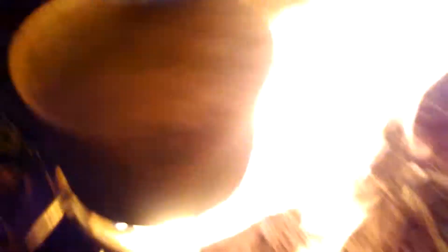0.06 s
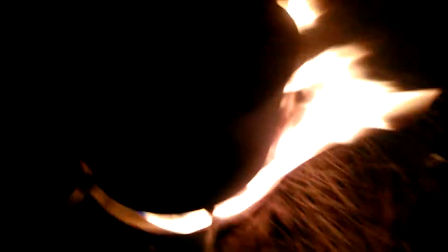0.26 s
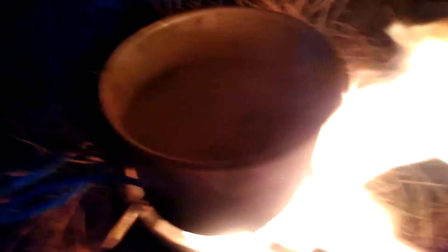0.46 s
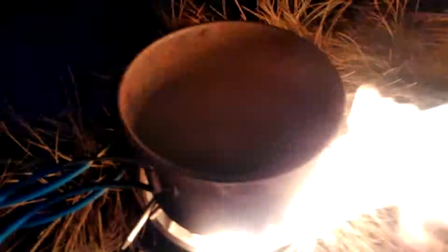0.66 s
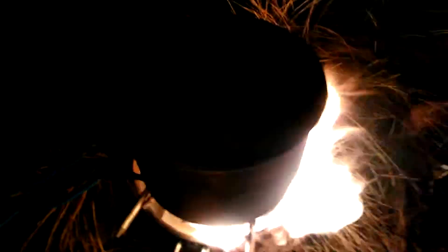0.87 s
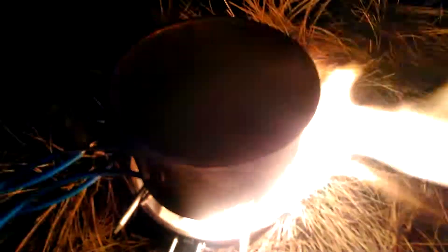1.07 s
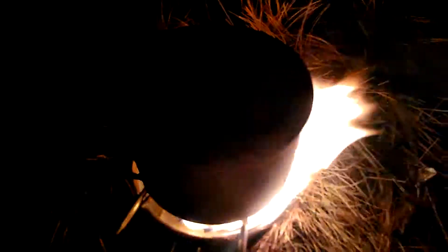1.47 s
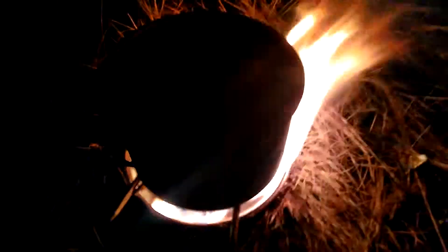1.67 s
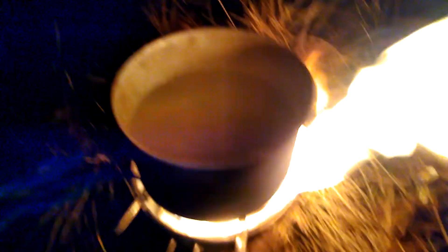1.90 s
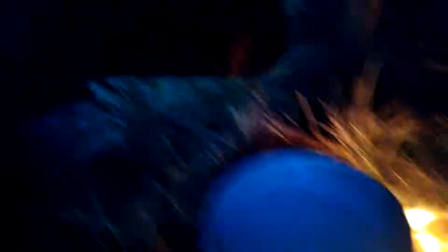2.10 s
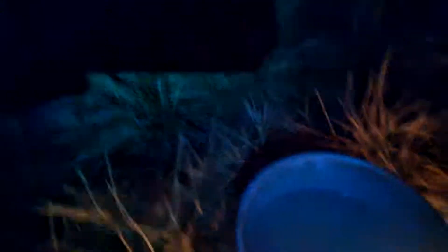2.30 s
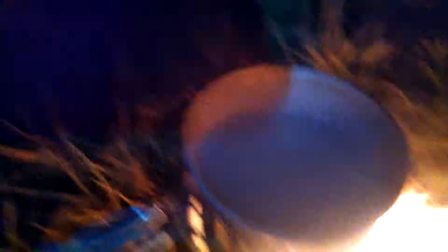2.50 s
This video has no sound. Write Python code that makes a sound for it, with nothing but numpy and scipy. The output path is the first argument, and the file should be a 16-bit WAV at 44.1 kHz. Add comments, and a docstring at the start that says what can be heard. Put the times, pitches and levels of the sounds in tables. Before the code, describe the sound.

Wind rumbles and thumps unevenly on a hand-held microphone at an outdoor camp, over steady thin hiss and a faintly fluttering stove flame. A single dry knock with a tiny rattle sounds halfway, then the gusts continue and fade.

```python
"""Light wind buffets a hand-held camera's two microphone ports, beside a small stove at a night camp.
Gusts rumble on both ports, mostly the right, where single eddies thump and the strongest gusts throb.
The flame under the pot is a soft roar that flutters in the gusts and gives off tiny pops.
One dry knock rings a few damped modes and trails a short, bright rattle.
A steady thin hiss lies under it all."""
import sys
import numpy as np
from scipy import signal
from scipy.fft import rfft, irfft, next_fast_len
from scipy.io import wavfile
from scipy.ndimage import uniform_filter1d, map_coordinates

SR = 44100
rng = np.random.default_rng(int(sys.argv[2]) if len(sys.argv) > 2 else 0)


def store_pcm(level_fs):
    """Save levels as 16-bit WAV."""
    pcm = np.round(np.clip(level_fs, -1, 1) * 32767).astype(np.int16)
    wavfile.write(sys.argv[1], SR, np.atleast_2d(pcm).T)


N = 116865
T = np.arange(N) / SR

# tone colour of each noise layer: frequency_hz, relative_db
HISS_LEFT_EQ = [(100, 0), (600, -2.5), (1100, -2.5), (1900, -1), (3300, -5), (4800, -12), (7000, -7),
                (9000, -2), (10500, -12), (13000, -12), (15500, -9)]
HISS_RIGHT_EQ = [(100, -17), (1100, -19.5), (2000, -20.5), (3400, -23), (5000, -16.5), (6200, -14.5),
                 (8000, -8.5), (8950, 1.5), (9800, -9.5), (11200, -18), (13300, -12), (15500, -21.5)]
FLAME_EQ = [(60, -8.5), (200, 1), (520, -1.5), (800, -11), (1300, -22.5), (2500, -43), (5000, -36)]
RATTLE_EQ = [(1200, -1), (2100, 1), (2550, -10), (3000, -2), (3700, 1), (4650, -7), (5600, -4), (6400, -7),
             (8000, -3), (9500, -7), (11000, -22), (13000, -22), (16000, -42)]
RUMBLE_EQ = [(20, -42), (33, -29), (46, -2.5), (72, 1), (110, -6.5), (170, -17), (300, -31), (600, -48),
             (1200, -61), (3000, -82)]
CHURN_EQ = [(70, -18), (150, 7.5), (300, -6), (550, -25), (1000, -31), (2500, -60)]
# slow drift of the hiss: time_s, gain_db
HISS_DRIFT = [(0, 0.5), (.16, 0), (.29, 1.25), (.62, 0.7), (.76, 0), (.9, 0.9), (1.08, -1), (1.41, -0.1),
              (1.65, -0.1), (1.85, 0.4), (2.1, .2), (2.23, -0.8), (2.37, 0.15), (2.65, 0.1)]
# the flame's roar between flutters: time_s, level_db
FLAME_BED = [(0, -62.5), (.5, -65.5), (.9, -60.5), (1.35, -61), (1.6, -70.5), (2.1, -65), (2.65, -70.5)]
# flutters of the flame: centre_s, level_db, half_length_s
FLUTTERS = [(0.212, -54.5, 0.0046), (0.26, -53, 0.0043), (0.312, -50, 0.0058), (.746, -43, 0.0058),
            (0.764, -50, 0.012), (0.812, -49.5, 0.042), (0.96, -68, 0.024), (1.299, -50.5, 0.017),
            (1.435, -52, 0.0094), (1.608, -54, 0.019), (1.693, -63, 0.0074), (2.033, -57, 0.008),
            (2.464, -59, 0.0035), (2.578, -56, 0.0052)]
# resonances of the knocked object: pitch_hz, level_db, t60_s, right_offset_db
BODY_MODES = [(232.4, -26, 0.089, 0.5), (383, -21.5, 0.072, -1), (520, -27.5, 0.048, 0),
              (902, -23, 0.036, -2.5), (1062, -31.5, 0.027, -3), (2090, -20, 0.035, -1.5)]
# the rattle's two contacts: start_s, level_db, t60_s, pitch_hz
CONTACTS = [(1.1586, -25.5, 0.014, 5600), (1.1605, -26, 0.016, 3700)]
# eddies on the right port: centre_s, level_db, half_width_s, signed_gain (+ pushes, - pulls)
EDDY_THUMPS = [(0.302, -23, 0.0011, -0.96), (0.313, -18.5, 0.002, 1), (0.419, -19.5, 0.0016, -0.84),
               (0.563, -12.5, 0.0029, -1.14), (0.6172, -17.5, 0.0011, -1.07), (0.6324, -10.5, 0.001, -1),
               (0.6349, -9.5, 0.00052, -0.89), (0.6496, -9, 0.001, -1.13), (0.7456, -15, 0.00094, -0.95),
               (0.748, -14, 0.00033, -0.98), (0.7491, -5.5, 0.00096, 0.83), (0.7707, -18, 0.00074, -1.2),
               (0.7774, -18.5, 0.00078, 0.97), (0.885, -22.5, 0.0012, -0.98), (0.974, -18.5, 0.0014, -0.85),
               (1.1694, -14, 0.0015, 0.91), (1.194, -18.5, 0.0012, -1.14), (1.545, -22, 0.0014, 1),
               (1.692, -33, 0.00064, -0.81), (1.842, -22, 0.00089, -0.91), (2.099, -20, 0.0015, -1.24),
               (2.111, -24, 0.001, 0.97), (2.1552, -10, .001, 0.98), (2.1856, -17, 0.00078, 1),
               (2.1883, -16.5, 0.00079, -1.15), (2.1995, -16.5, 0.0012, -1), (2.3368, -22, 0.0013, 0.93),
               (2.361, -19, 0.0015, -1.05)]
# deep throbs on the right port: centre_s, level_db, pitch_hz, half_length_s
GUST_THROBS = [(0.314, -17.5, 75, 0.011), (0.408, -18, 69, 0.028), (0.686, -19, 82, 0.014),
               (1.851, -22.5, 74, 0.012), (2.104, -24, 75, 0.018)]
# the breeze between gusts: time_s, left_db, right_db
BREEZE_BED = [(0, -43.5, -45), (.5, -50.5, -37), (.8, -38, -31.5), (1.3, -58, -44.5), (1.65, -37.5, -42.5),
              (2, -51.5, -46), (2.4, -53, -44), (2.65, -58, -59)]
# gusts on the ports: centre_s, left_db, right_db, half_length_s
GUST_SWELLS = [(0.259, -34, -42, 0.021), (0.314, -33.5, -24.5, 0.02), (0.349, -33, -53, 0.022),
               (0.404, -64, -23, 0.031), (0.458, -34, -31, .016), (0.545, -40, -29.5, 0.03),
               (0.648, -60, -23.5, 0.037), (0.697, -30.5, -31, 0.03), (0.748, -29.5, -36, 0.022),
               (0.813, -32.5, -47, 0.042), (0.892, -53, -30.5, 0.013), (0.964, -45, -28, 0.03),
               (1.001, -27.5, -59, 0.017), (1.055, -34.5, -45, 0.043), (1.18, -47, -25.5, 0.042),
               (1.347, -36.5, -60, 0.031), (1.538, -61, -37.5, 0.029), (1.695, -32, -38, 0.019),
               (1.841, -56, -29.5, 0.016), (2.104, -59, -29.5, 0.021), (2.129, -28, -35, 0.0059),
               (2.167, -42, -24, 0.01), (2.203, -55, -27, 0.02), (2.352, -59, -31, 0.02),
               (2.393, -62, -36, 0.0095)]
# arrival delay of the knock and the rattle's ring, left then right: delay_s
PORT_DELAYS = np.array([[0], [0.00022]])


def amp(db):
    return 10 ** (np.asarray(db) / 20)


def unit(x):
    return x / np.sqrt(np.mean(x ** 2) + 1e-20)


def wobble(knots_per_s):
    """A smooth random modulation curve."""
    return map_coordinates(rng.standard_normal(2000), [T * knots_per_s], mode="wrap")


def filtered(x, response):
    """x through an EQ whose gain is response(hz)."""
    size = next_fast_len(N + SR // 2)
    return irfft(rfft(x, size) * response(np.fft.rfftfreq(size, 1 / SR)), size)[..., :N]


def noise(eq):
    """Noise of rms 1, coloured by an EQ table."""
    points_hz, db = np.transpose(eq)
    white = rng.standard_normal(N)
    return unit(filtered(white, lambda hz: amp(np.interp(np.log(hz + 1), np.log(points_hz), db))))


def stereo_noise(eq, shared):
    """Coloured noise with a shared fraction of its power common to both sides."""
    return np.sqrt(shared) * noise(eq) + np.sqrt(1 - shared) * np.array([noise(eq), noise(eq)])


def steadied(x, samples):
    """x levelled to about rms 1 over a sliding window."""
    power = uniform_filter1d(uniform_filter1d(x * x, samples), samples)
    return unit(x / np.sqrt(np.abs(power) + 1e-3))


def patchy(x, depth_db):
    """x with small random patches of gain in time and pitch."""
    spectrogram = signal.stft(x, nperseg=1024)[2]
    patches = uniform_filter1d(rng.standard_normal(spectrogram.shape), size=4, axis=-2)
    patches = uniform_filter1d(patches, size=6, axis=-1)
    return signal.istft(spectrogram * amp(depth_db * unit(patches)), nperseg=1024)[1][..., :N]


def struck(t, attack_s, t60_s):
    """Envelope of a blow at t = 0: quick rise, exponential fall."""
    t = np.maximum(t, 0)
    return (1 - np.exp(-(t / attack_s) ** 2)) * np.exp(-np.log(1000) * t / t60_s)


def swell(centre_s, half_length_s):
    """A bell-shaped fade in and out."""
    return np.exp(-((T - centre_s) / half_length_s) ** 2)


def pulse(centre_s, half_width_s, rebound_ratio=2.5):
    """One smooth push of pressure between two shallow, wider rebounds."""
    return swell(centre_s, half_width_s) - swell(centre_s, half_width_s * rebound_ratio) / rebound_ratio


def hiss():
    """A bed of hiss that wavers slightly, louder and with a thin high peak on the right."""
    bed = np.array([amp(-59) * noise(HISS_LEFT_EQ), amp(-48) * noise(HISS_RIGHT_EQ)])
    waver_db = np.interp(T, *np.transpose(HISS_DRIFT)) + 0.3 * wobble(knots_per_s=25)
    return patchy(bed, depth_db=1.2) * amp(waver_db)


def pops(per_s=11, base_db=-49, scatter_db=2, half_width_s=0.00064):
    """The flame gives tiny soft pops at random moments."""
    out = np.zeros(N)
    for when, size, width in rng.random((int(per_s * N / SR), 3)):
        level_db = base_db - scatter_db * np.log(1.05 - size)
        out += amp(level_db) * pulse(when * N / SR, half_width_s * 2 ** (2 * width - 1))
    return out


def flame(flicker_db=2.5):
    """A soft flickering roar that swells briefly when the flame is blown about."""
    bed_db = np.interp(T, *np.transpose(FLAME_BED)) + flicker_db * wobble(knots_per_s=70)
    flutters = sum(amp(db) * swell(s, half_length) for s, db, half_length in FLUTTERS)
    return (amp(bed_db) + flutters) * stereo_noise(FLAME_EQ, shared=0.79)


def rattle(attack_s=0.0004, ring_db=-7):
    """Two quick contacts follow the knock, each a bright snap with a brief high ring."""
    out = np.zeros((2, N))
    for start_s, db, t60_s, hz in CONTACTS:
        t = T - start_s
        snap = stereo_noise(RATTLE_EQ, shared=0.29) * struck(t, attack_s, t60_s)
        ring = struck(t, attack_s, t60_s=0.014) * np.sin(2 * np.pi * hz * (t - PORT_DELAYS))
        out += amp(db) * (snap + amp(ring_db) * ring)
    return out


def knock(start_s=1.1516, attack_s=0.0013, tock_hz=1820, tock_half_length_s=0.00085):
    """A dry blow gives a hard tock, left of centre, and rings a few damped modes."""
    t = T - start_s - PORT_DELAYS
    tock_envelope = swell(start_s + attack_s + PORT_DELAYS, tock_half_length_s)
    tock = amp([[-10], [-16.5]]) * tock_envelope * np.sin(2 * np.pi * tock_hz * t)
    body = sum(amp([[db], [db + right_db]]) * struck(t, attack_s, t60_s) * np.sin(2 * np.pi * hz * t)
               for hz, db, t60_s, right_db in BODY_MODES)
    return tock + body


def throbs():
    """The strongest gusts shake the air at the right port for a few deep cycles."""
    right = sum(amp(db) * swell(s, half_length) * np.cos(2 * np.pi * hz * (T - s))
                for s, db, hz, half_length in GUST_THROBS)
    return np.array([np.zeros(N), right])


def eddies():
    """Single eddies thump as they push or pull at the right port."""
    right = sum(gain * amp(db) * pulse(s, half_width) for s, db, half_width, gain in EDDY_THUMPS)
    return np.array([np.zeros(N), right])


def port_turbulence(strength, churn_db=-49.5, mid_wind_db=-39.5, lump_db=6):
    """Wind on one port drives a deep rumble and a finer, lumpy churn."""
    churn = unit(noise(CHURN_EQ) * amp(lump_db * wobble(knots_per_s=60)))
    rumble = steadied(noise(RUMBLE_EQ), samples=1100)
    # the churn grows more slowly than the rumble, so strong gusts sound deeper
    churn_gain = amp(churn_db) * (strength / amp(mid_wind_db)) ** 0.84
    return strength * rumble + churn_gain * churn


def wind():
    """Short gusts ride on a dying breeze; each port has its own turbulence."""
    times, *sides = np.transpose(BREEZE_BED)
    breeze_power = amp([np.interp(T, times, side) for side in sides]) ** 2
    gust_power = sum((amp([[left_db], [right_db]]) * swell(s, half_length)) ** 2
                     for s, left_db, right_db, half_length in GUST_SWELLS)
    return np.array([port_turbulence(np.sqrt(power)) for power in breeze_power + gust_power])


def scene(low_cut_hz=40):
    """The stereo mix at the two ports, which shut out the deepest part of the wind."""
    air = wind() + eddies() + throbs()
    buffeting = filtered(air, lambda hz: 1 / np.sqrt(1 + (low_cut_hz / (hz + 1)) ** 10))
    return buffeting + flame() + knock() + rattle() + hiss() + pops()


def record(dry, high_cut_hz=15780):
    """The camera's band limit is a brick-wall high cut."""
    return filtered(dry, lambda hz: hz < high_cut_hz)


dry = scene()
out = record(dry)
store_pcm(out)
```